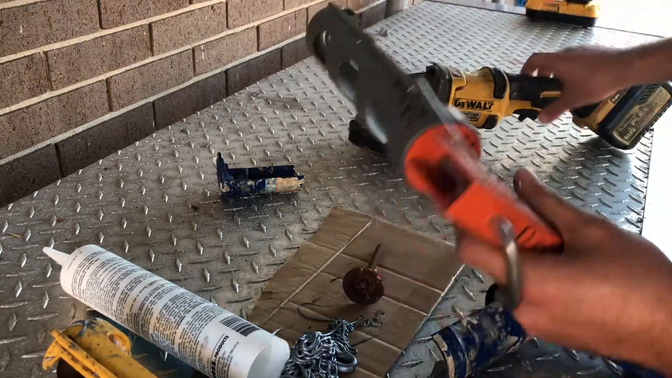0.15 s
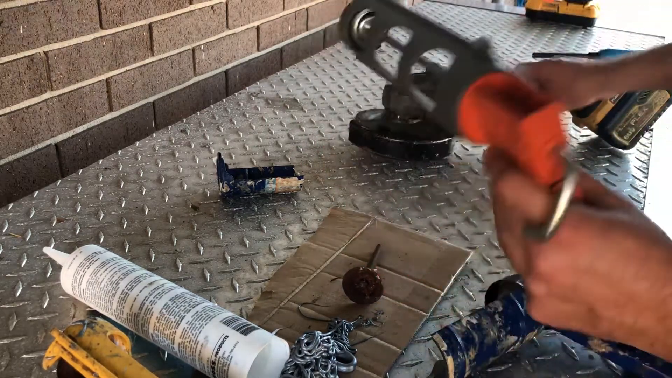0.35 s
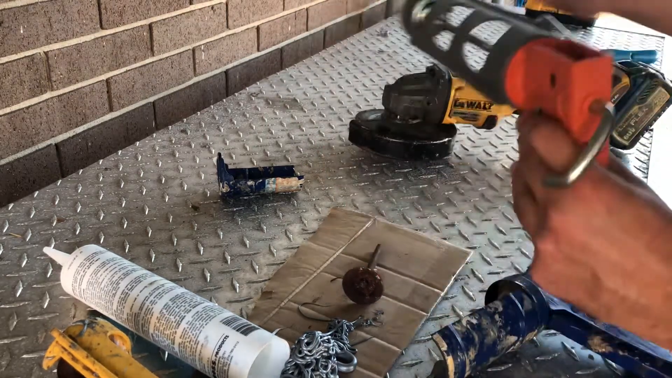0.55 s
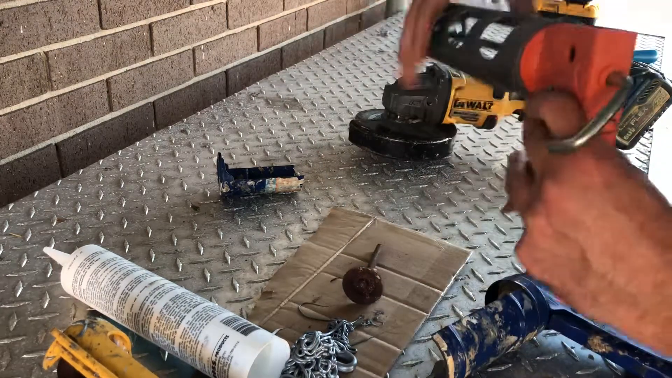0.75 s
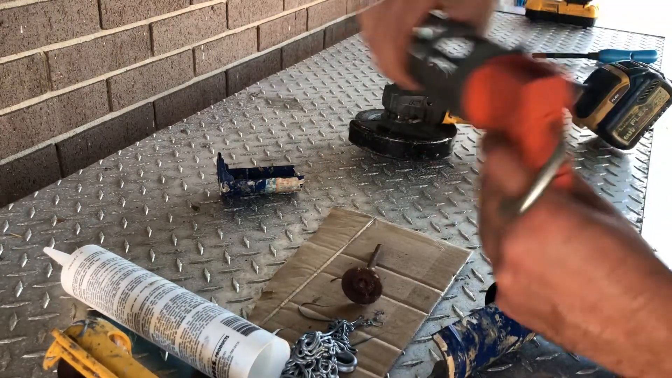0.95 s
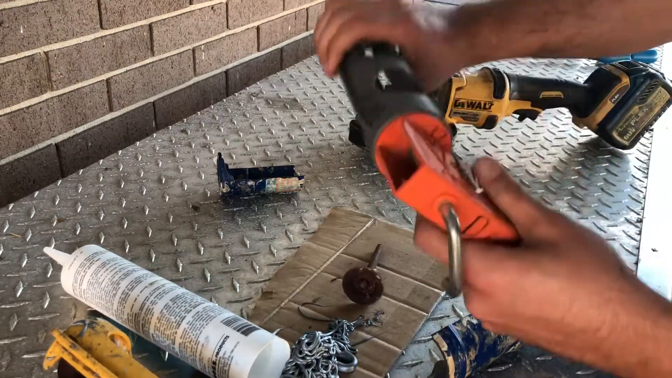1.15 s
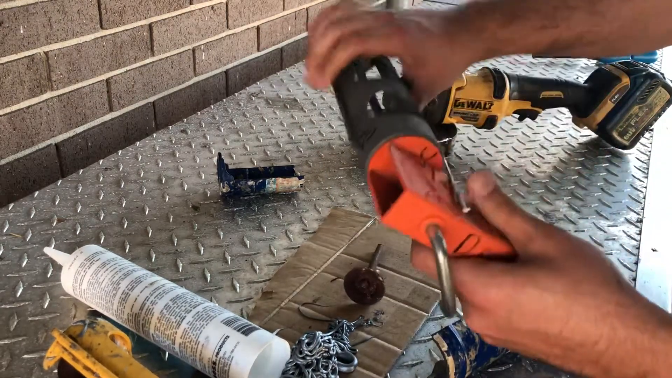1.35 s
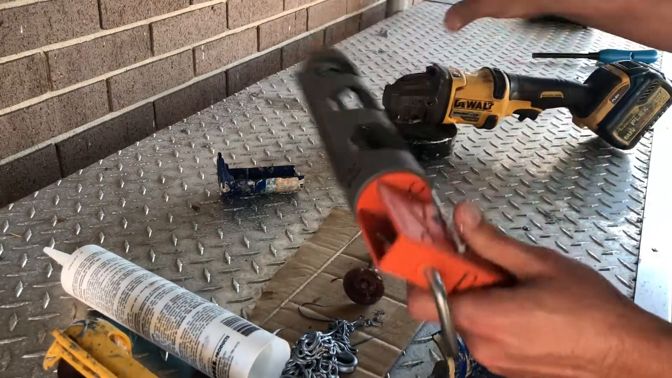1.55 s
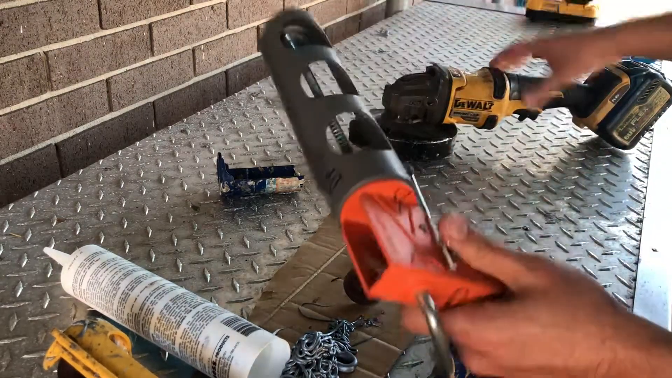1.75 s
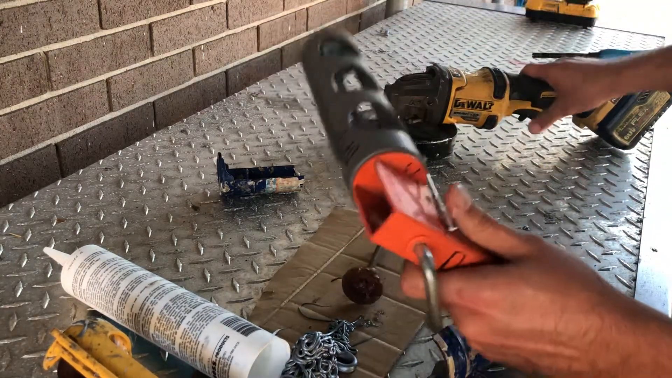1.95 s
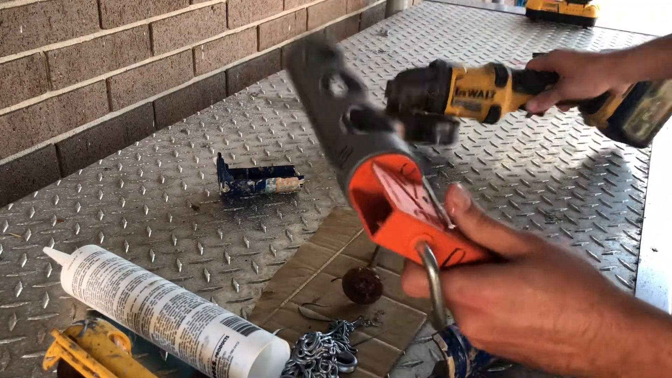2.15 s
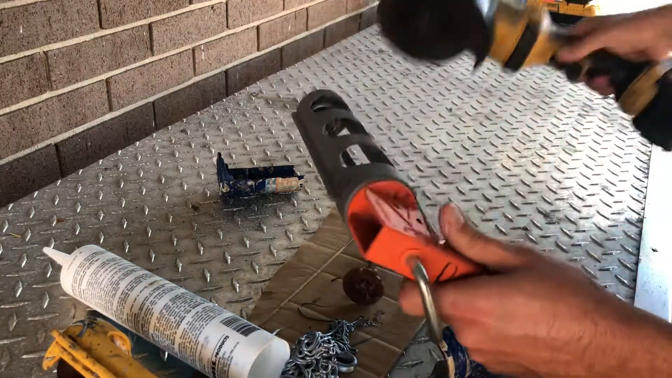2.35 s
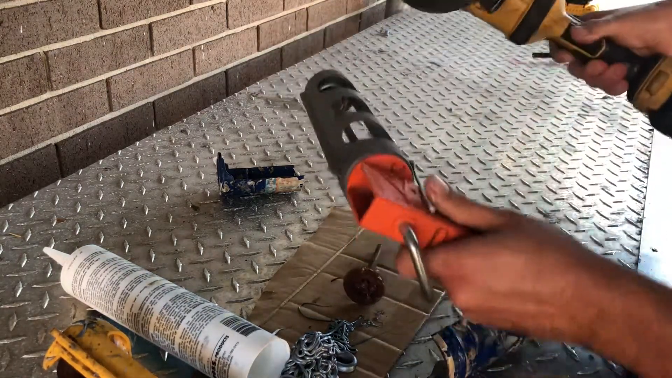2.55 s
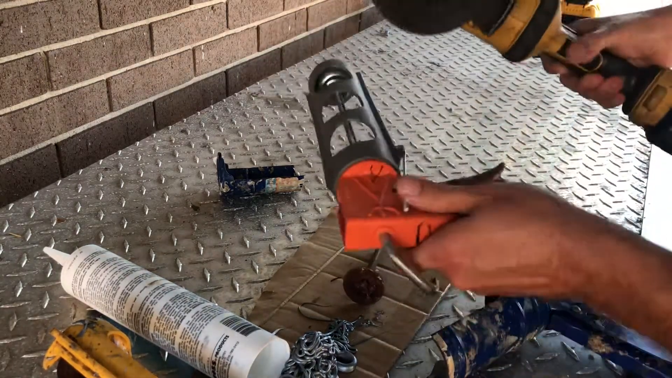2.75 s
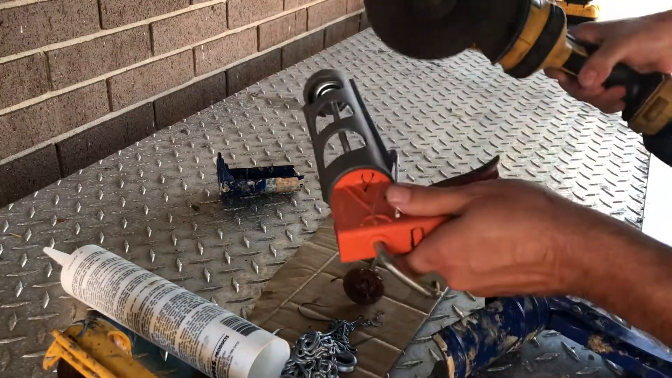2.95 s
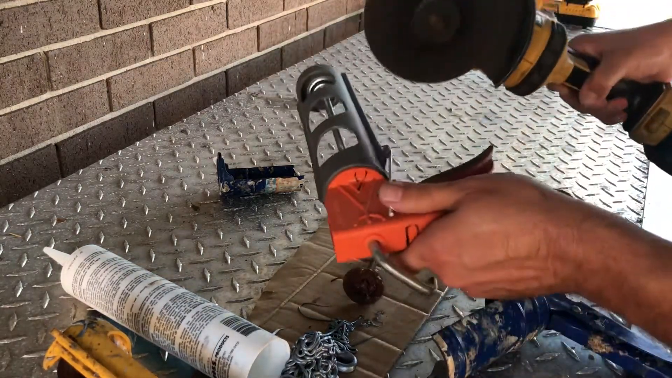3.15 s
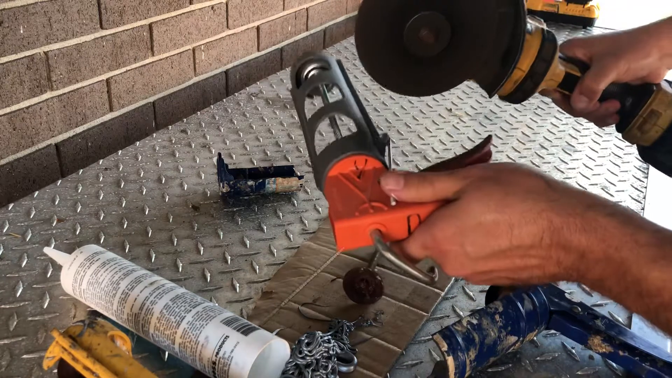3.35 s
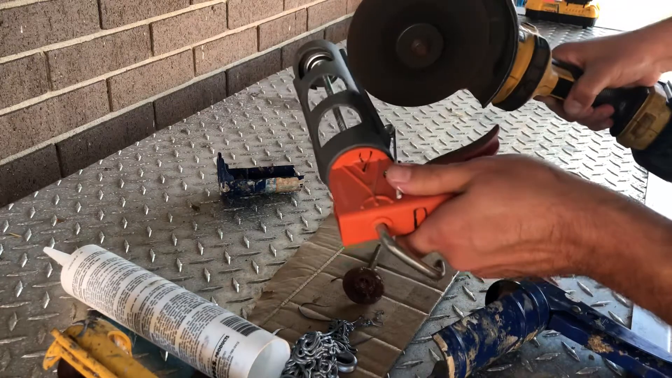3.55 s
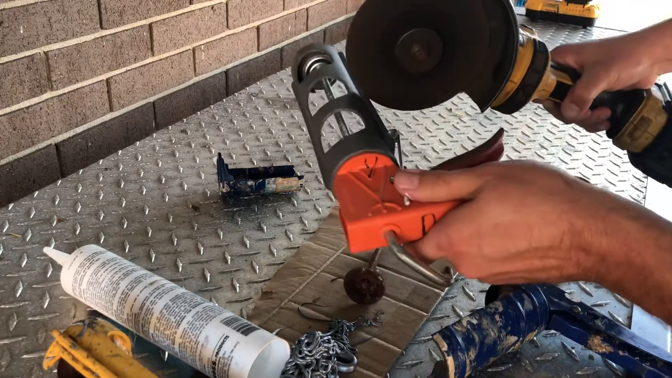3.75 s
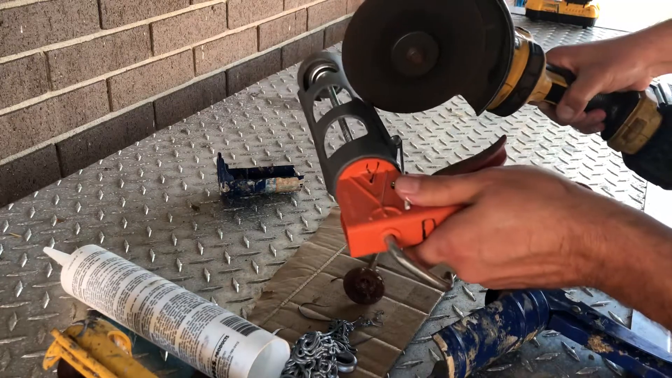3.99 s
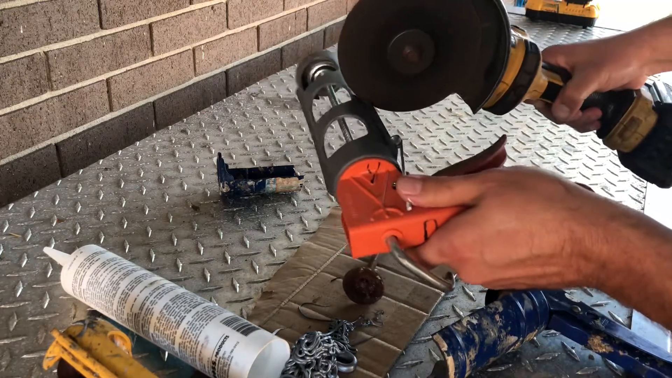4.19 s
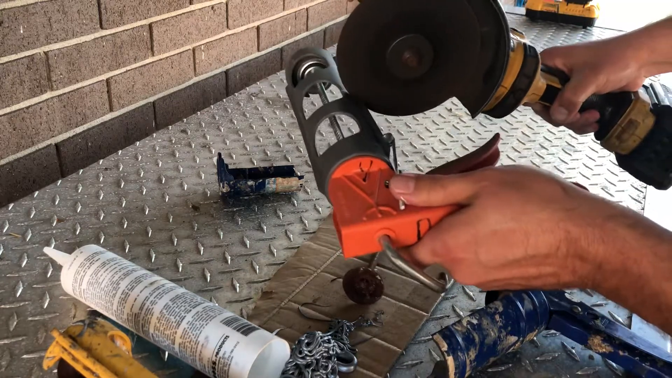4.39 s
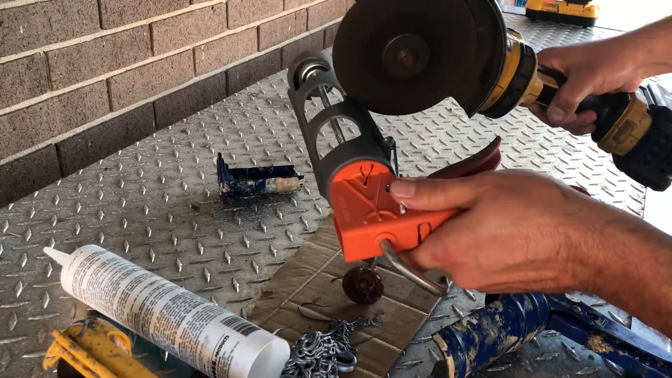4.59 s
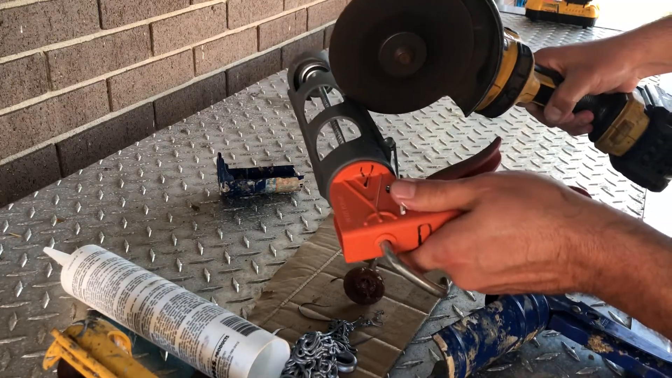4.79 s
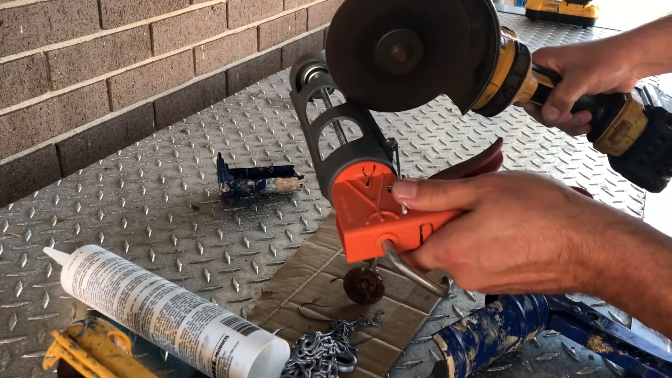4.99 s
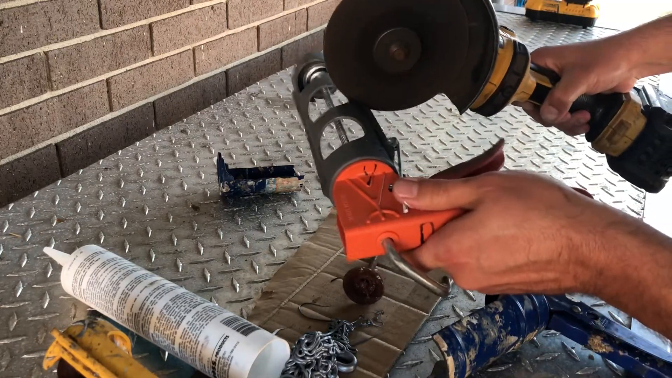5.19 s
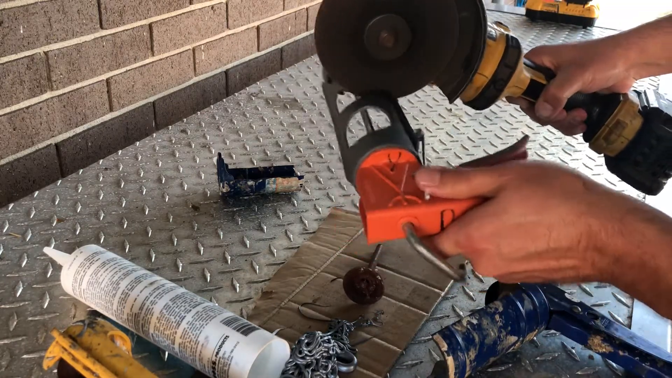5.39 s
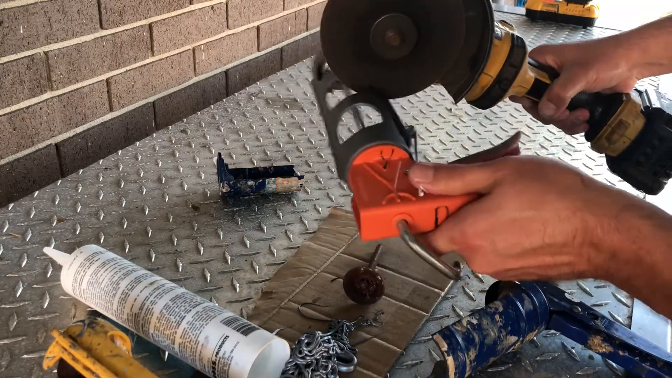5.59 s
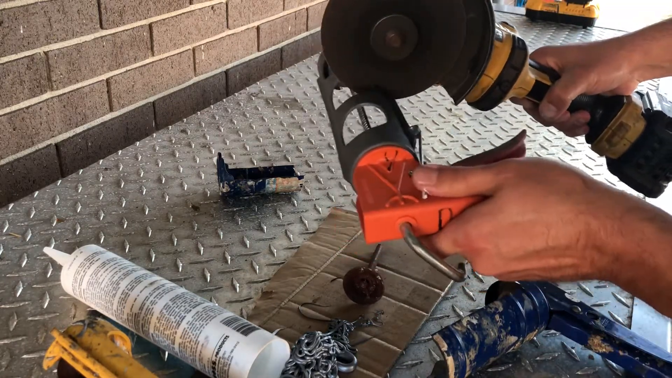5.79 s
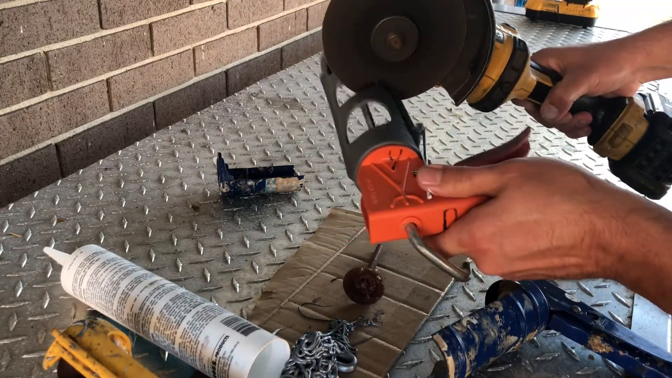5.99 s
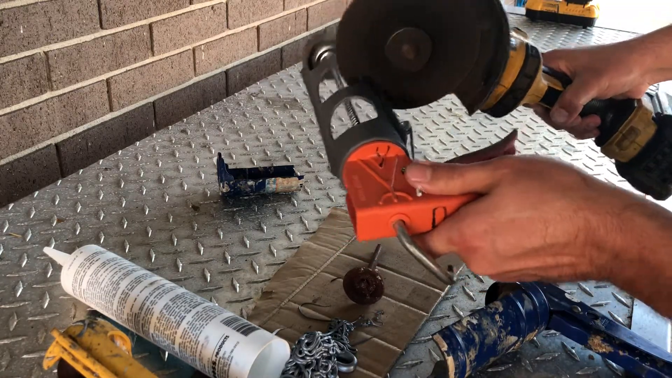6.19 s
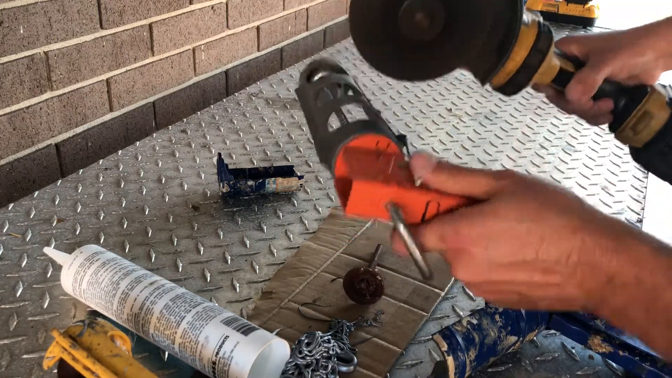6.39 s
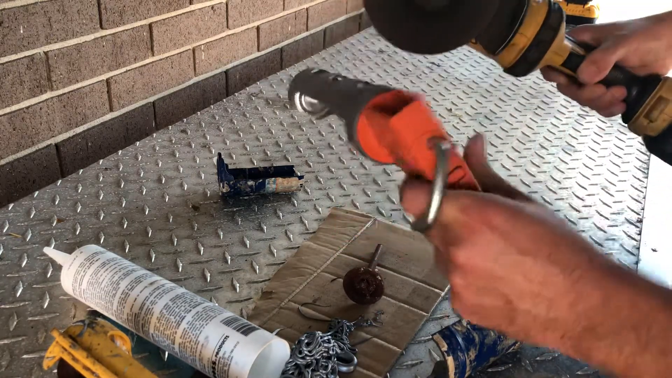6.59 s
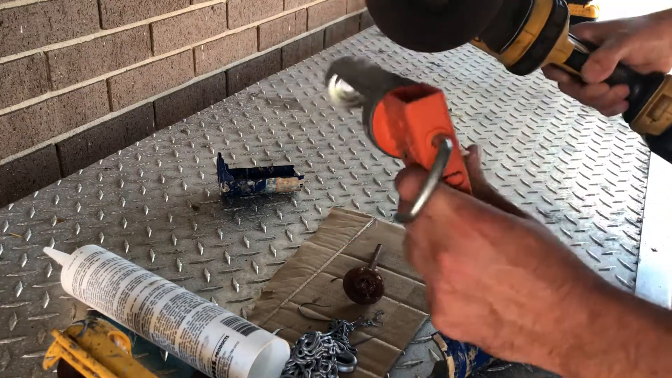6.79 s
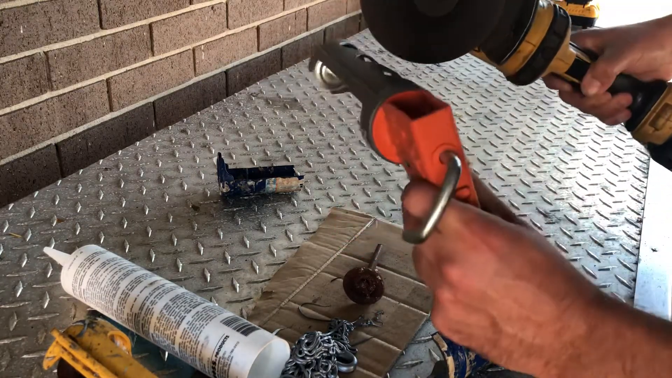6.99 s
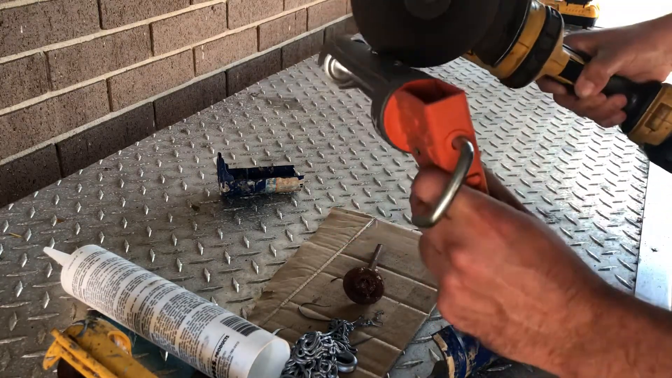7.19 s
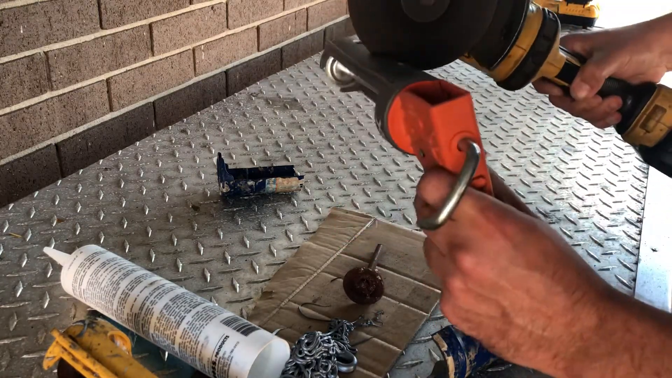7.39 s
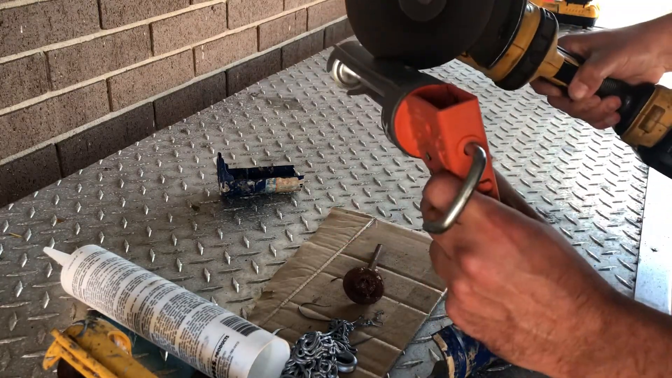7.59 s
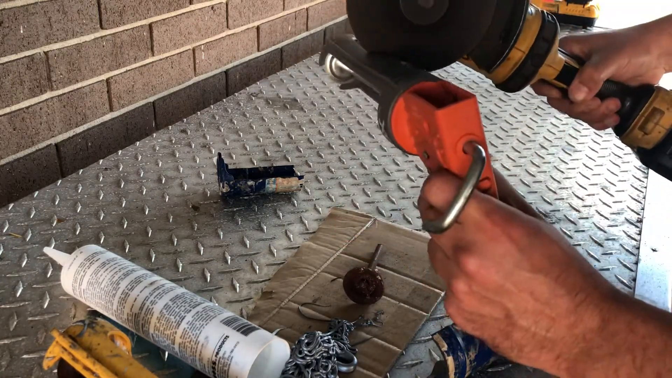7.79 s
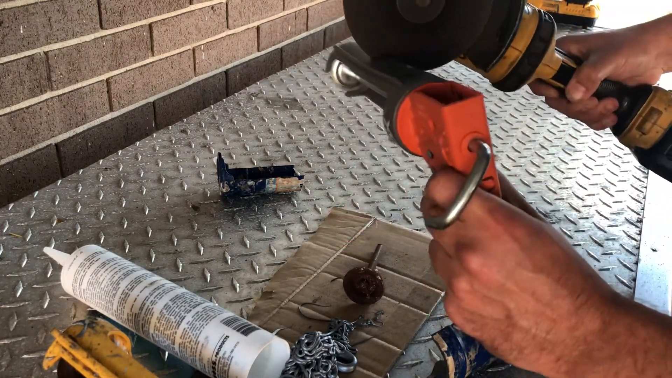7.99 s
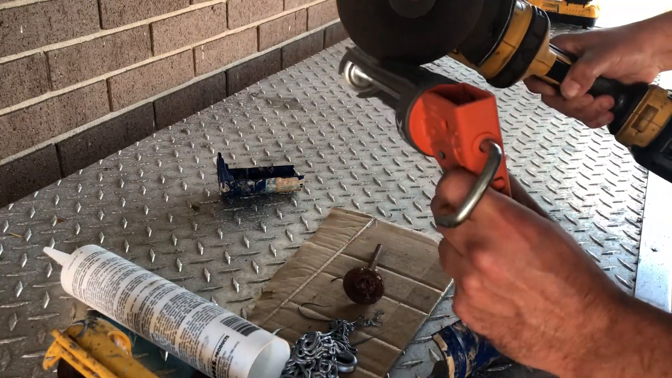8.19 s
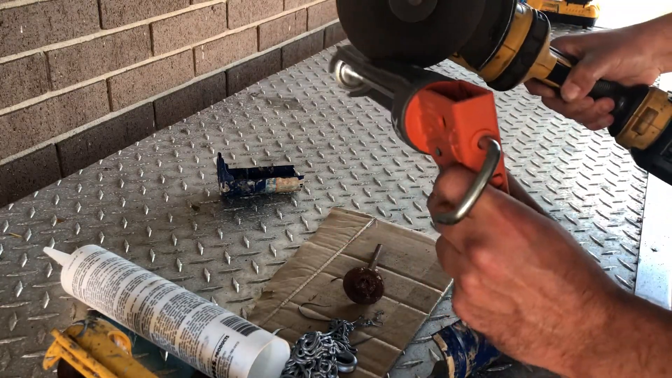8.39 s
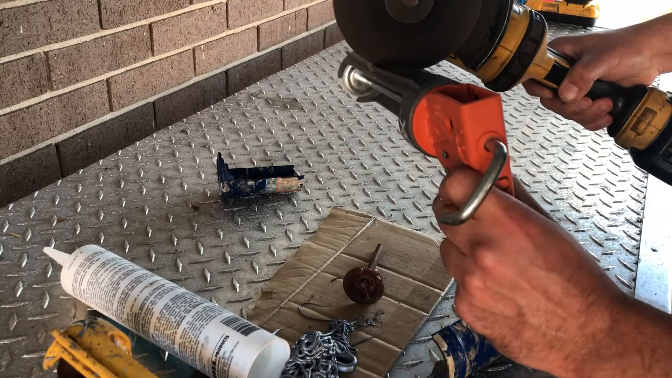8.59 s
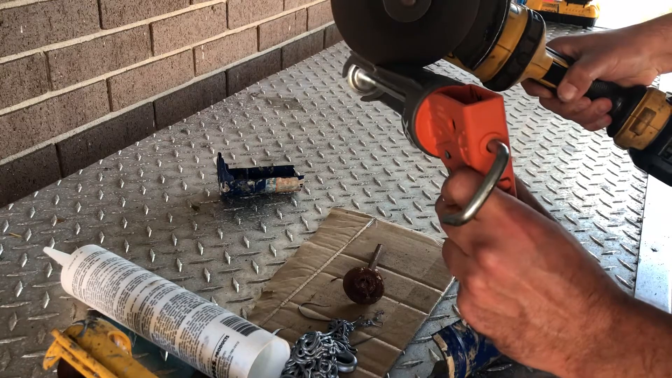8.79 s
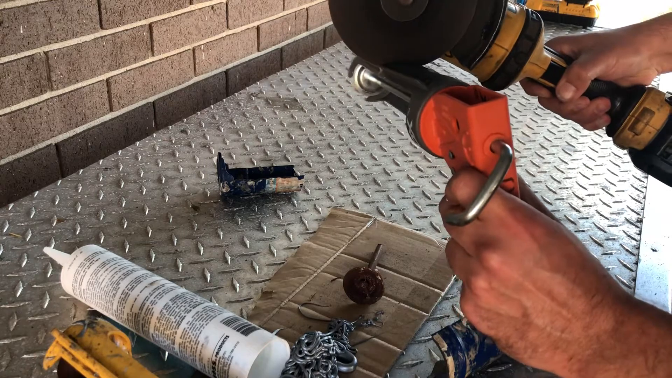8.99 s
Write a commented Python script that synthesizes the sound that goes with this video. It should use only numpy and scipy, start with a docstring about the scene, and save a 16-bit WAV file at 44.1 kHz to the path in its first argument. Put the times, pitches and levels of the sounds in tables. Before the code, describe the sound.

Light metal clicks, then a cordless angle grinder whines up and cuts a metal tube twice, rasping and squealing, with a brief rattling pause.

```python
"""Light metal clicks and slides: a caulking gun is turned over above a steel bench. Then a cordless
angle grinder is picked up, whines up to speed and cuts the gun's metal barrel twice, rasping and
squealing. Between the cuts the trigger is let go and the slack gears coast, rattling. One spindle
speed drives the gears, the motor hum and the rasp of the wheel's rim. The sound is close and mono,
with short echoes and the quiet hum of a distant machine behind."""
import sys
import numpy as np
from scipy import signal
from scipy.fft import rfft, irfft
from scipy.io import wavfile
from scipy.ndimage import uniform_filter1d, minimum_filter1d

SR = 44100
rng = np.random.default_rng(int(sys.argv[2]) if len(sys.argv) > 2 else 0)


def dump_mix(stems):
    """Bounce the given channels to the path in sys.argv[1] as a 16-bit WAV at rate SR."""
    frames = np.atleast_2d(stems).T  # one column per channel
    limited = np.clip(frames, -1, 1)  # hard clip at full scale
    pcm = np.round(limited * 32767).astype(np.int16)
    wavfile.write(sys.argv[1], SR, pcm)


N = 399105
TIME, HZ = np.arange(N) / SR, np.fft.rfftfreq(N, 1 / SR)
FREE_SPEED, GEAR_RATIO = 129, 3.3  # unloaded spindle turns per s; motor turns per spindle turn


# Wheel on barrel: touch_s, lift_s, level_db, drift_db_per_s, steadiness (0-1), steadiness_loss_per_s
CUTS = [(3.553, 6.32, -26, 0.36, 0.82, 0.13), (7.274, 9.1, -20, -2.5, 0.88, 0.21)]
# Colour of the rasp, one list a cut: freq_hz, level_db
RASP_COLOURS = [
    [(530, -51), (900, -24), (1460, -3.5), (1720, -9), (2470, -7.5), (3040, -14.5), (4460, -0.5),
     (5680, -12.5), (7580, -5), (16000, -14)],
    [(530, -42), (900, -13.5), (1530, -2), (2790, -10), (3550, -7.5), (4460, 1.5), (6970, -8.5), (7770, -1),
     (16000, -7)],
]
# Resonances of wheel and barrel, one list a cut: pitch_hz, width_hz, boost_db
CUT_MODES = [
    [(2423, 43, 8), (3300, 69, 11), (5200, 350, 6.5), (7770, 51, 0), (8210, 220, 5), (15000, 1100, 6.5)],
    [(2700, 350, 13.5), (4060, 94, 5), (5170, 230, 9), (6340, 350, 5.5), (6650, 68, 7), (7630, 1010, 7.5),
     (9540, 580, 6.5), (11300, 230, 5.5), (13000, 300, 4.5), (13200, 300, 6), (14900, 300, 9),
     (16400, 600, 6)],
]
# Ring of the flexing wheel: spindle_multiple, level_db
WHEEL_TONES = [(12, 0), (13, -2.5), (18, -6), (22, -35)]

def cut(row, spectrum, modes, turns, sag, grip, bite_db, flex_db):
    """The same grit scrapes past every turn, loose grit hisses, and the rim's high spots press harder."""
    touch, lift, level_db, drift_db_per_s, _, _ = row
    high_spots_db = 2 * rim(turns, lasting_turns=18, harmonics=9)
    pressure = unit(amp(high_spots_db + 1.94 * np.sin(2 * np.pi * turns) + 1.45 * wander(70)))
    boost_db = sum(db * resonance(HZ, hz, width) for hz, width, db in modes)
    body = shape(spectrum) * amp(boost_db)
    hiss = colour(rng.standard_normal(N) * pressure, body, band_hz=(9000, 16000))
    scrape = colour(rim(turns, lasting_turns=36, harmonics=176) * pressure, body)
    rasp = np.sqrt(grip) * np.std(hiss) * unit(scrape) + np.sqrt(1 - grip) * hiss
    rasp *= amp(level_db + drift_db_per_s * (TIME - touch) + 0.3757 * sag + bite_db)
    # the wheel flexes in step with its turning, more under load, shaken by the cut
    ring = tones(turns, WHEEL_TONES) * amp(-40 + 1.7551 * sag + flex_db + wander(120))
    return (rasp + ring) * during(touch, lift, 0.0048)


def rim(turns, lasting_turns, harmonics, points=1024):
    """Roughness of the rim passing the cut: it repeats each turn and slowly wears into a new shape."""
    keep = np.exp(-1 / lasting_turns)
    fresh = rng.standard_normal((points, harmonics, 2)) @ [1, 1j]  # one spectrum a turn
    fresh[:, 0] = 0
    worn = signal.lfilter([1], [1, -keep], fresh, axis=0)
    profile = irfft(worn, points).ravel()
    return unit(np.interp(turns * points, np.arange(len(profile)), profile))


def groove_grip(row, speeds, settle_s=0.21):
    """How steadily the wheel sits in its groove: it settles quickly, then loosens as the cut deepens."""
    touch, _, _, _, steadiness, loss_per_s = row
    grip = np.clip(steadiness - loss_per_s * (TIME - touch), 0, .95)
    return grip * during(speeds[0][0], speeds[-1][0], settle_s)


# Swells of the wheel's squeal: start_s, peak_s, end_s, level_db
SQUEALS = [(4.604, 5.12, 5.6, -25), (5.4, 5.6, 7, -32), (7.28, 7.4, 8.1, -36)]
# Harmonics that the barrel picks out: spindle_multiple, level_db
BARREL_TONES = [(18, -4), (22, 4), (33, -7), (35, -4), (41, -1), (50, -6), (53, -6), (75, -5)]
# The barrel sings in the second cut, entering past its peak: start_s, peak_s, end_s, level_db
BARREL_SWELL = (7.28, 6.5, 8, -27.5)

def squeal_and_sing(turns, speed, mode_hz=7550, width_hz=220):
    """Rim harmonics squeal as they slide through the wheel's high mode; the barrel sings on others."""
    squeal = sum(tones(turns, [(k, 0)], waver_db=2.5) * resonance(k * speed, mode_hz, width_hz)
                 for k in range(58, 66))
    squeal *= sum(swell(*row, depth_db=7) for row in SQUEALS)
    singing = tones(turns, BARREL_TONES, waver_db=2.5) * swell(*BARREL_SWELL, depth_db=19)
    return (squeal + singing) * amp(2.5 * wander(110))


# Bright snaps late in the first cut: start_s, peak_db
SNAPS = [(6.074, -8), (6.093, -12), (6.116, -12), (6.125, -12), (6.146, -7), (6.181, -14)]

def grit_snaps():
    """Loose grit snaps as the wheel skips out of its groove."""
    return place((s, hit(db, hz=12500, t60=.01, octaves=0.72)) for s, db in SNAPS)


# Brief swells and dips in loudness: centre_s, half_length_s, rasp_db, gear_db, wheel_ring_db
LEVEL_RIDES = [(3.398, 0.014, 0, -1.5, 0), (3.5, 0.11, 1, 1.5, 0), (3.57, 0.0099, 10, -2, 0),
               (3.585, 0.0063, -8, -15, 0), (3.641, 0.01, 8, -25, -9), (3.71, 0.019, 3, -20, 2),
               (3.903, 0.17, -1.5, 2.5, 8.5), (4.046, 0.028, -2.5, -3, -1), (4.21, 0.056, -2.5, 5, 3.5),
               (4.37, .04, -0.5, -3, 0), (4.509, 0.083, -5, 3.5, 4.5), (4.672, 0.024, -8, -5, 0),
               (4.806, .05, -4.5, 4, 5.5), (5.06, 0.11, -2, 2.5, 5.5), (5.328, 0.066, -2, -3, -7),
               (5.643, 0.056, 1.5, -2.5, -0.5), (5.73, 0.036, -3, 1, 6.5), (6.049, 0.021, 6, -0.5, 0),
               (6.119, 0.087, -6.5, -5, -24), (6.205, 0.017, -2, -1, 16), (6.293, 0.041, -1, -4.5, 6),
               (7.197, 0.1, -3, -2.5, 3), (7.282, 0.0073, 9, -14, 4), (7.32, 0.05, -2, -8, 0),
               (8, 0.063, -1.5, -2, -3), (8.2, 0.14, -1.5, 1, 1.5), (8.44, .06, 1, -2.5, 2),
               (8.73, .07, -1.5, 2, 2.5), (8.98, 0.1, -1.5, 1.5, 4)]

def level_rides():
    """Rasp, gear rattle and wheel ring briefly swell and dip: one curve in dB for each."""
    return sum(np.outer(levels_db, pulse(s, half_s)) for s, half_s, *levels_db in LEVEL_RIDES)


# Pulls of the trigger: pressed_s, let_go_s, spin_up_strain (0-1)
TRIGGER = [(3.097, 6.42, 0.82), (6.981, 9.2, 0.4)]
# Spindle speed with the wheel in its groove, one list a cut: time_s, turns_per_s
LOADED_SPEEDS = [
    [(3.64, 127.8), (3.73, 126.8), (5.19, 121.2), (5.34, 118.3), (5.43, 122.0), (5.54, 121.4),
     (5.65, 123.2), (5.73, 121.6), (5.91, 122.4), (5.98, 121.3), (6.08, 121.9)],
    [(7.28, 127.9), (7.426, 126.3), (7.954, 123.6), (8.334, 123.0), (8.408, 123.9), (8.462, 122.0),
     (8.552, 123.8), (8.664, 122.6), (8.718, 123.2), (8.99, 121.6), (9.05, 120.7)],
]

def spindle(spin_up_s=.56, coast_s=.88, ease_off_s=0.24, bite_s=.08, recover_s=.35):
    """The motor speeds up while the trigger is held and coasts when let go; cutting drags it down."""
    pull_speed, ease_span = 300, 77  # turns per s: the motor's aim; the last stretch, where strain eases
    free, strain, held, sag = np.zeros((4, N))
    for pressed, let_go, effort in TRIGGER:
        before = np.interp(pressed, TIME, free)
        powered_s = np.clip(TIME - pressed, 0, let_go - pressed)
        rise = pull_speed - (pull_speed - before) * np.exp(-powered_s / spin_up_s)
        governed = np.minimum(rise, FREE_SPEED)
        run_down = np.exp(-np.maximum(TIME - let_go, 0) / coast_s)
        free = np.where(TIME > pressed, governed * run_down, free)
        finger = during(pressed, let_go, 0.011) * np.clip((let_go - TIME) / ease_off_s, 0, 1)
        strain += effort * finger * np.clip((FREE_SPEED - free) / ease_span, 0, 1)
        held += finger
    for rows in LOADED_SPEEDS:
        loaded = curve([(rows[0][0] - bite_s, FREE_SPEED), *rows, (rows[-1][0] + recover_s, FREE_SPEED)])
        sag += FREE_SPEED - loaded  # turns per s lost to the cut
    return free - sag, sag, np.clip(strain, 0, 1), held


# Colour of the gears speeding up, coasting and running free: freq_hz, level_db
STRAINING = [(560, -33.5), (950, -29), (1150, -13.5), (1820, -15), (2220, 2), (2560, -7), (3790, -20.5),
             (4740, -4), (5520, -12.5), (9400, -20.5), (15100, -28), (16000, -33)]
COASTING = [(410, -56), (700, -45), (819, 1), (922, -22.5), (1210, -4), (1710, -8), (2800, 3.5),
            (3690, -9.5), (4550, -2), (5760, -10), (14600, -38), (16000, -31)]
RUNNING = [(410, -32), (700, -24), (1090, -6.5), (1380, -3.5), (1680, -5.5), (2400, -1), (2770, -6),
           (4550, -4.5), (8210, -6), (16000, -20)]

def gearbox(turns, strain, held, grip, ride_db, seat_s=0.062, take_up_s=0.0085):
    """Teeth chatter in the housing: slack gears clack, loaded gears are pressed quiet."""
    labour = np.clip(1.44 * strain, 0, 1)
    # the teeth stay loose for a moment after the trigger is pressed
    seated = held * (1 - sum(pulse(pressed, seat_s) for pressed, _, _ in TRIGGER))
    slack = np.clip(0.71 * (1 - seated) + 0.13 * seated * (1 - grip), 0, 1) * (1 - labour)
    flutter_db = 2 * wander(400) - 2.9 * slack * np.cos(2 * np.pi * (turns - .2))
    flutter_db += np.sin(2 * np.pi * GEAR_RATIO * turns)
    teeth = unit(rng.standard_normal(N) * amp(flutter_db))
    blend = [(labour, STRAINING), (slack, COASTING), (np.clip(1 - labour - slack, 0, 1), RUNNING)]
    chatter = sum(share * colour(teeth, shape(tone), band_hz=(1800, 3200)) for share, tone in blend)
    clacks = backlash(turns) * amp(-6 + 5 * slack)
    # the rattle dips while the motor takes up the slack
    take_up = sum(pulse(pressed - take_up_s, take_up_s) for pressed, _, _ in TRIGGER)
    level_db = -20.5 + 10.5 * strain - 5.5 * (1 - held) - 5 * take_up - 8 * grip + ride_db
    return (chatter + clacks) * amp(level_db)


def backlash(turns, spread_db=4.5):
    """Loose teeth strike the housing about once a turn, each blow a little early or late."""
    count = int(turns[-1])
    late, force = rng.standard_normal((count, 2)).T
    samples = np.searchsorted(turns, np.arange(count) + .6 + .1 * late)
    strikes = np.zeros(N)
    strikes[np.minimum(samples, N - 1)] = amp(spread_db * np.clip(force, -2, 1.6))
    return unit(signal.oaconvolve(strikes, housing_ring())[:N])


# Modes of the gear housing: pitch_hz, level_db, t60_s
HOUSING_MODES = [(1280, -21, 0.058), (1993, 1, 0.033), (2900, -7, 0.057), (4670, -3, 0.019),
                 (4430, 7.5, 0.026), (4730, -2, 0.045), (7400, -5, 0.023), (8840, -1, 0.014)]

def housing_ring():
    """The small struck housing: its modes each die at their own speed and radiate no bass."""
    t = TIME[:2 ** 11]
    ring = sum(amp(db - 60 * t / t60) * np.sin(2 * np.pi * hz * t) for hz, db, t60 in HOUSING_MODES)
    ring = signal.sosfilt(signal.butter(2, 1100, "high", fs=SR, output="sos"), ring)
    return ring / np.max(abs(ring))


# Hard accents, mostly from the gears, one as the wheel touches the barrel at 7.28 s: start_s, level_db
KNOCKS = [(3.6104, -14), (3.6244, -9), (3.6651, -4), (3.7224, -7), (6.4317, -10.5), (6.4818, -9),
          (6.7042, -16), (6.8992, -8.5), (6.9855, -20), (7.1116, -2), (7.1438, -7), (7.1717, -7),
          (7.2779, -21), (7.3088, -5), (7.4274, -11), (7.4584, -2)]

def gear_knocks(boost_db=3):
    """Single knocks ring the housing."""
    return place((s, amp(db + boost_db) * housing_ring()) for s, db in KNOCKS)


# Hum of the shafts: spindle_multiple, level_db
SHAFT_TONES = [(2, -56), (2.3, -57.5), (2.998, -46), (4.001, -46.5), (5, -59), (5.999, -68)]
# Low rush of the cooling air: freq_hz, level_db
FAN_COLOUR = [(100, -96), (190, -19), (250, 2), (330, -1), (600, -1.5), (800, 4), (1100, -13.5),
              (2500, -28)]
# What the housing lets through of the whine: freq_hz, gain_db
WHINE_BAND = [(300, -46), (700, -12.5), (1100, -5.5), (1700, -4), (2200, -6), (2500, -11), (2750, -3),
              (2900, -9), (3200, -19)]

def motor(turns, speed, strain):
    """Unbalance and cooling air grow with speed; under strain the rotor growls and the windings whine."""
    pace = speed / FREE_SPEED
    hum = tones(turns, SHAFT_TONES) * pace ** 4
    rotor = tones(turns, [(GEAR_RATIO, -44)]) * pace ** 2 * amp(12 * strain)
    fan = colour(rng.standard_normal(N), shape(FAN_COLOUR)) * amp(-39.5) * pace ** 1.7
    whine_multiple = 9 * GEAR_RATIO  # nine pulses a motor turn
    housing = np.interp(whine_multiple * speed, HZ, shape(WHINE_BAND))
    whine = tones(turns, [(whine_multiple, -16)]) * np.sqrt(strain) * housing * amp(3.5 * wander(200))
    return hum + rotor + fan + whine


def windage(speed, level_db=-30, low_cut_hz=2400):
    """Air hisses off the spinning wheel and dies away as it slows."""
    high_pass = 1 / np.hypot(1, (low_cut_hz / (HZ + 1)) ** 2)
    return colour(rng.standard_normal(N), high_pass) * amp(level_db) * (speed / FREE_SPEED) ** 4.1


# Clicks of the plunger, the grinder leaving the bench, the switch: start_s, peak_db, pitch_hz, t60_s
CLICKS = [(0.584, -36, 1810, 0.018), (0.9896, -29, 3020, 0.026), (1.0938, -18.5, 4320, 0.021),
          (1.4426, -36, 1810, 0.042), (1.6325, -16.5, 1900, 0.015), (1.6606, -23, 2370, 0.02),
          (1.791, -24.5, 3360, 0.025), (1.8418, -14.5, 1990, 0.024), (2.0253, -39, 3550, 0.02),
          (2.135, -22.5, 2300, 0.044), (2.158, -34, 3690, 0.02), (2.188, -18.5, 1690, 0.024),
          (2.29, -46, 3000, .015), (2.39, -52, 5000, .015), (2.555, -48, 5000, .012),
          (2.8325, -42, 2000, .015), (2.9836, -44, 1830, .015), (2.914, -27, 2820, 0.031),
          (3.0791, -9, 2180, 0.024), (3.0995, -9.5, 1930, 0.12)]
# Low thuds and ringing metal taps, one during the first cut: start_s, peak_db, pitch_hz, t60_s
TAPS = [(.13, -44, 85, .1), (1.613, -23, 3700, .04), (1.632, -12, 1590, .022), (1.635, -40.5, 513, .06),
        (2.137, -29, 560, 0.046), (2.156, -31, 218, 0.093), (2.215, -37, 231, .1), (2.28, -40, 200, .08),
        (6.203, -6.5, 1800, 0.026)]

def clicks_and_taps():
    """Short blows: clicks ring a wide spread of modes, thuds and taps a narrow-pitched one."""
    clicks = place((s, hit(db, hz, t60, octaves=1.83)) for s, db, hz, t60 in CLICKS)
    taps = place((s, hit(db, hz, t60, octaves=0.16)) for s, db, hz, t60 in TAPS)
    return clicks + taps


def hit(peak_db, hz, t60, octaves, tail_db=-31.5, tail_t60=0.15, attack_s=0.00039):
    """A short blow rings a cluster of modes around one pitch, with a faint longer ring."""
    t = TIME[:2 ** 13]
    distance = np.log2((np.fft.rfftfreq(len(t), 1 / SR) + 1) / hz) / octaves
    phases = np.exp(2j * np.pi * rng.random(len(distance)))
    modes = irfft(phases / (1 + distance ** 2) ** 1.9)
    decay = amp(-60 * t / t60) + amp(tail_db - 60 * t / tail_t60)
    sound = modes * decay * (1 - np.exp(-t / attack_s))
    return amp(peak_db) * sound / np.max(abs(sound))


# Slides of the plunger rod or the grinder: start_s, peak_s, end_s, level_db
SLIDES = [(.15, 0.348, 0.63, -56.5), (.58, .6, 0.67, -52), (0.743, 0.755, .81, -54),
          (0.948, 1.073, 1.114, -37), (1.407, 1.45, 1.5, -48), (1.55, 1.64, 1.67, -33.5),
          (1.78, 1.817, 1.87, -28), (1.956, 2.028, 2.1, -40.5), (2.12, 2.18, 2.186, -31)]
# Colour of the sliding metal: freq_hz, level_db
SLIDE_COLOUR = [(710, -56), (1200, -10), (1590, -2), (2110, -13), (2510, -0.5), (3430, -3), (5180, -13),
                (9210, -14.5), (13200, -19), (15000, -14), (16000, -25)]

def slides(trim_db=-1.5, grain_db=2):
    """Metal slides on metal in small uneven slips."""
    slips = unit(rng.standard_normal(N) * amp(grain_db * wander(350)))
    strokes = sum(swell(*row, depth_db=19.5) for row in SLIDES)
    return colour(slips, shape(SLIDE_COLOUR)) * amp(trim_db) * strokes


def with_echoes(x, wet_db=-11.5, t60=0.16):
    """Bench and brick wall throw back a short spray of echoes."""
    t = TIME[:2 ** 13]
    echoes = rng.standard_normal(len(t)) * (rng.random(len(t)) < .04)
    echoes *= (t > .002) * amp(-60 * t / t60)
    return x + amp(wet_db) * signal.oaconvolve(x, echoes / np.linalg.norm(echoes))[:N]


# Drone behind the scene: pitch_hz, level_db
MACHINE_TONES = [(118.4, -63.5), (300, -63.5), (726.7, -57.5), (1276, -69), (1663, -68), (1814, -54.5),
                 (4400, -75)]

def distant_machine(trim_db=-1.5, width_hz=22, fuzz=0.63):
    """A distant machine hums on steady, slightly fuzzy tones."""
    drone = np.zeros(N)
    for hz, db in MACHINE_TONES:
        phase = 2 * np.pi * hz * TIME
        tone = (1 + fuzz * wander(width_hz)) * np.sin(phase) + fuzz * wander(width_hz) * np.cos(phase)
        drone += amp(db + trim_db) * tone
    return drone


# Colour of the air bed: freq_hz, level_db
AIR_COLOUR = [(25, -33), (50, -10), (85, 6), (125, 1), (200, -8.5), (310, -6.5), (500, -14.5), (730, -3),
              (1000, -8.5), (1280, -1), (1550, -17.5), (1820, -6.5), (2400, -20.5), (4400, -26.5),
              (5200, -34), (9000, -37), (16000, -54)]
# Level ride of the air bed: time_s, gain_db
AIR_RIDE = [(3.55, 9.5), (3.75, -6.5), (8.5, -2), (8.8, 9)]

def air(base_db=-56):
    """Faint air noise around the bench; it drops at the first cut and comes back near the end."""
    return amp(base_db + curve(AIR_RIDE)) * colour(rng.standard_normal(N), shape(AIR_COLOUR))


def amp(db):
    """Decibels to gain."""
    return 10 ** (np.asarray(db) / 20)


def unit(x):
    """Scales to rms 1."""
    return x / np.sqrt(np.mean(x ** 2) + 1e-20)


def curve(points):
    """Straight lines through (time_s, value) points, at every sample."""
    return np.interp(TIME, *np.transpose(points))


def during(start, end, fade_s):
    """A gate that fades in from start and out from end."""
    return np.clip(np.minimum(TIME - start, end + fade_s - TIME) / fade_s, 0, 1)


def pulse(centre_s, half_length_s):
    """A smooth bell of height 1."""
    return np.exp(-np.minimum(((TIME - centre_s) / half_length_s) ** 2, 20))


def swell(start, peak, end, db, depth_db):
    """A gain that grows to a peak and dies away."""
    contour_db = np.interp(TIME, [start, peak, end], [-depth_db, 0, -depth_db])
    return amp(db + contour_db) * during(start, end, 0.009)


def resonance(hz, centre_hz, width_hz):
    """A resonant peak of height 1."""
    return 1 / (1 + (2 * (hz - centre_hz) / width_hz) ** 2)


def shape(points):
    """Gain at every frequency from (freq_hz, level_db) points."""
    hz, db = np.transpose(points)
    return amp(np.interp(np.log(HZ + 1), np.log(hz), db))


def colour(x, gain, band_hz=(0, SR)):
    """Filters x so that white noise of rms 1 comes out with rms 1 inside the band."""
    inside = (HZ >= band_hz[0]) & (HZ <= band_hz[1])
    return irfft(rfft(x) * gain / np.sqrt(np.mean(gain ** 2 * inside)), N)


def wander(rate_hz):
    """A random drift of rms 1."""
    knots = rng.standard_normal(4000)
    return unit(np.interp(TIME * rate_hz, np.arange(len(knots)), knots))


def tones(turns, partials, waver_db=2):
    """Sines locked to the spindle, each wavering in level."""
    sines = (amp(db + waver_db * wander(14)) * np.sin(2 * np.pi * (k * turns + rng.random()))
             for k, db in partials)
    return np.sqrt(2) * sum(sines)


def place(events):
    """Mixes (start_s, sound) pairs onto one track."""
    track = np.zeros(N)
    for start_s, sound in events:
        part = track[round(start_s * SR):][:len(sound)]
        part += sound[:len(part)]
    return track


def scene():
    """The grinder follows its spindle and the load on its wheel; handling and background join it."""
    speed, sag, strain, held = spindle()
    turns = np.cumsum(speed * (1 + 0.00064 * wander(30))) / SR
    bite_db, gear_db, flex_db = level_rides()
    grips = [groove_grip(row, speeds) for row, speeds in zip(CUTS, LOADED_SPEEDS)]
    gears = gearbox(turns, strain, held, sum(grips), gear_db)
    meshing = np.clip(speed / 50, 0, 1)  # full voice from 50 turns per s
    grinder = meshing * (gears + motor(turns, speed, strain) + windage(speed))
    cutting = sum(cut(row, spectrum, modes, turns, sag, grip, bite_db, flex_db)
                  for row, spectrum, modes, grip in zip(CUTS, RASP_COLOURS, CUT_MODES, grips))
    cutting += squeal_and_sing(turns, speed)
    close = cutting + grinder + clicks_and_taps() + grit_snaps() + gear_knocks() + slides()
    mono = with_echoes(close) + distant_machine() + air()
    return np.array([mono, mono])


def record(dry, ceiling=.95, top_hz=15950):
    """A fast limiter holds the peaks down; a steep low-pass trims the highest treble."""
    allowed = ceiling / np.maximum(abs(dry[0]), ceiling)
    limited = dry * uniform_filter1d(minimum_filter1d(allowed, size=61), size=61)
    low_pass = signal.firwin(511, top_hz, window=("kaiser", 9), fs=SR)
    return signal.oaconvolve(limited, low_pass[None], "same")


dry = scene()
out = record(dry)
dump_mix(out)
```